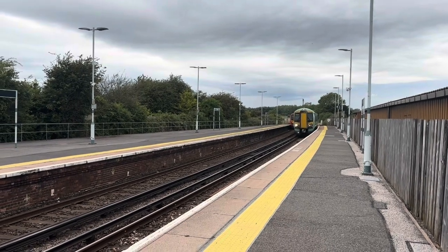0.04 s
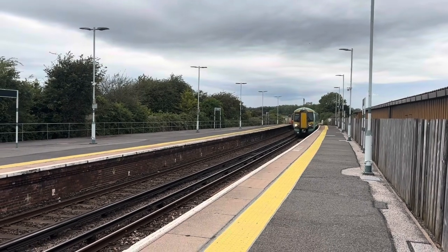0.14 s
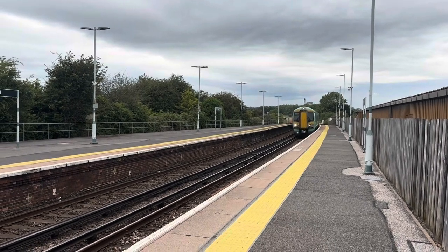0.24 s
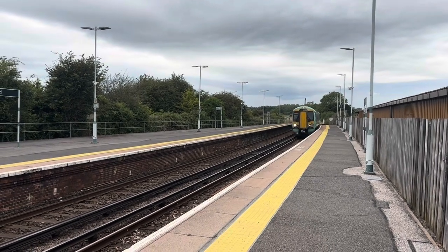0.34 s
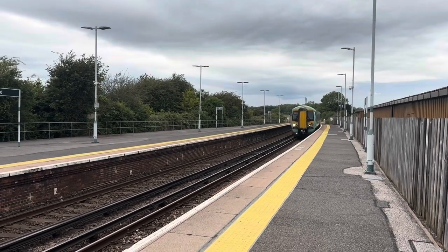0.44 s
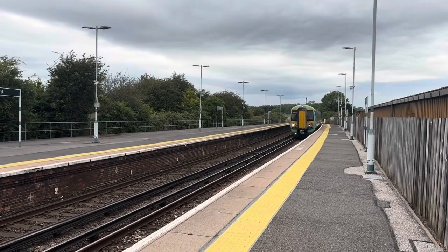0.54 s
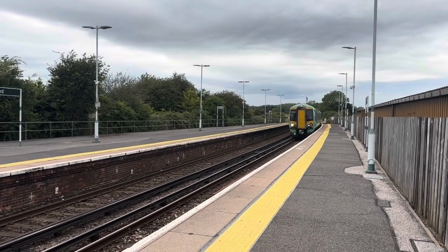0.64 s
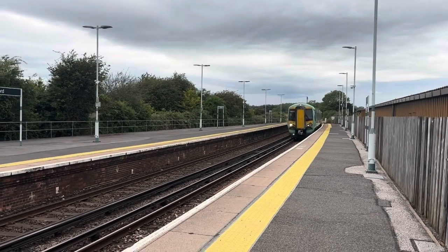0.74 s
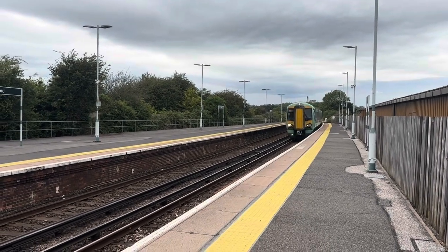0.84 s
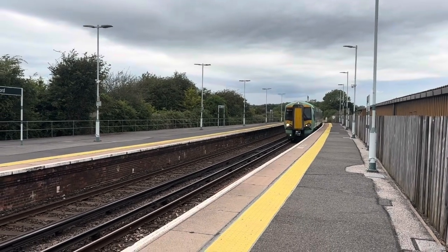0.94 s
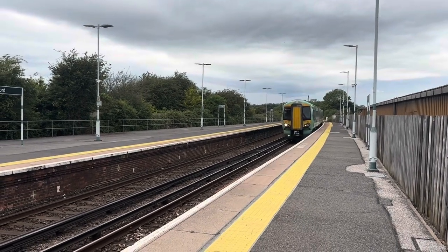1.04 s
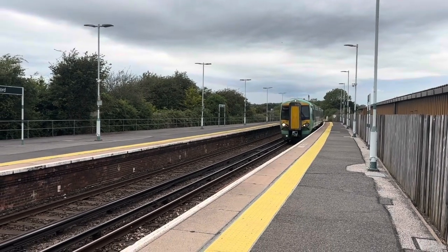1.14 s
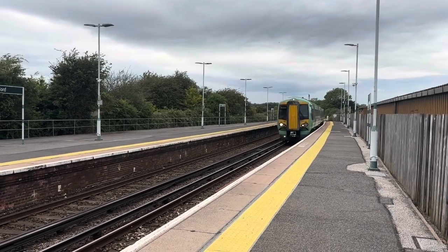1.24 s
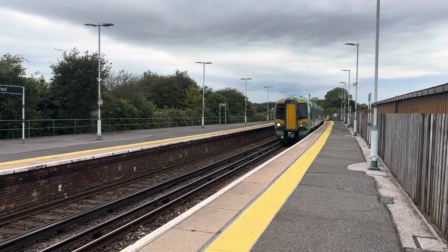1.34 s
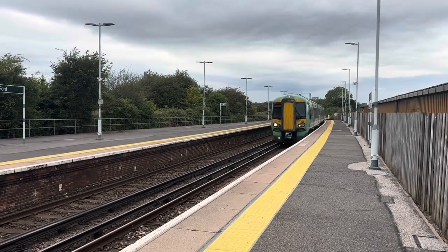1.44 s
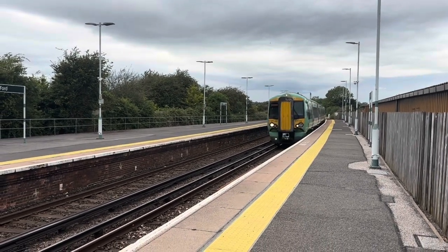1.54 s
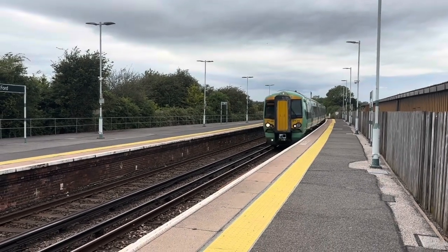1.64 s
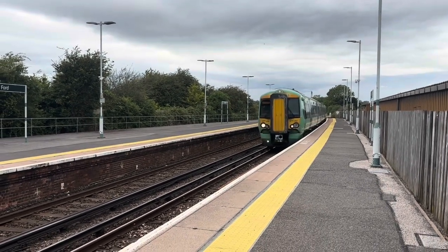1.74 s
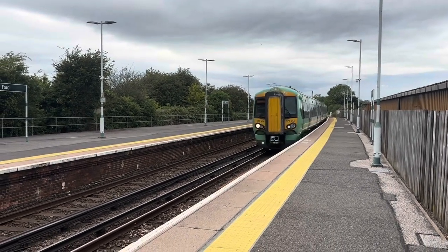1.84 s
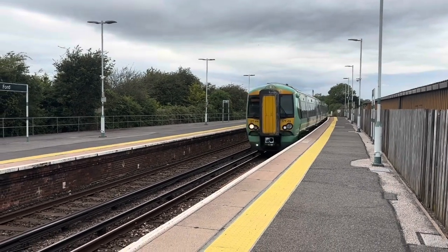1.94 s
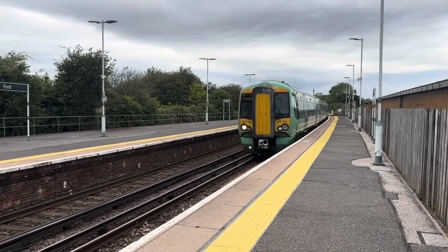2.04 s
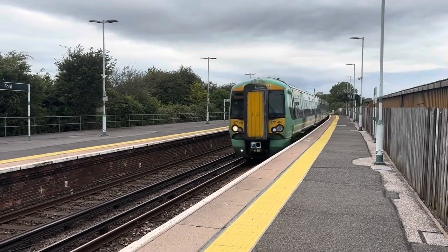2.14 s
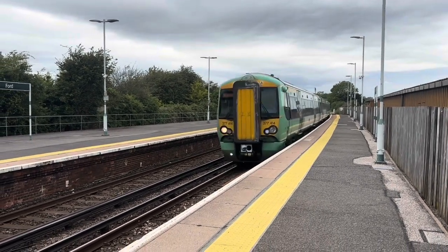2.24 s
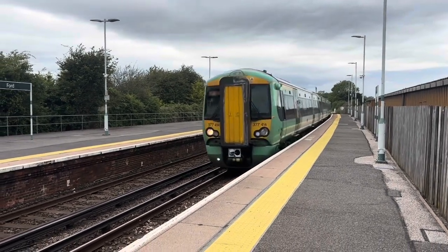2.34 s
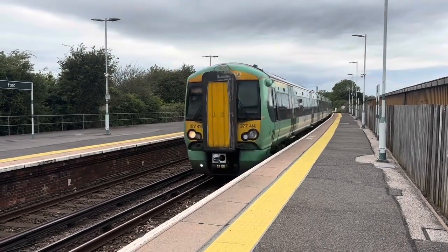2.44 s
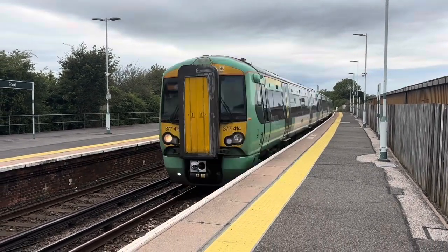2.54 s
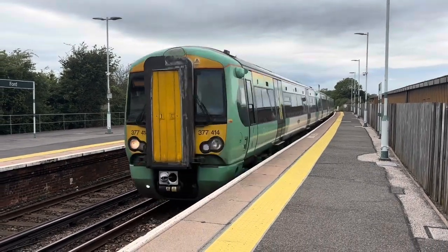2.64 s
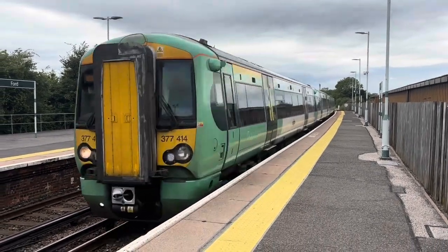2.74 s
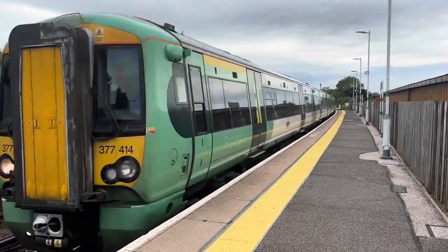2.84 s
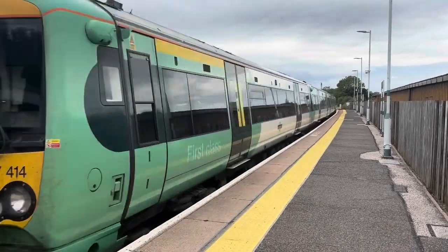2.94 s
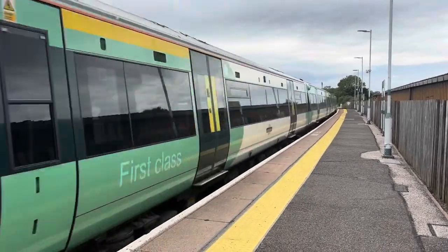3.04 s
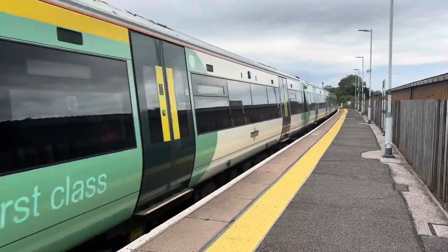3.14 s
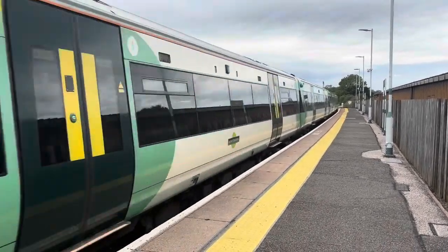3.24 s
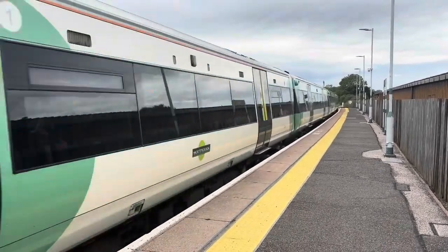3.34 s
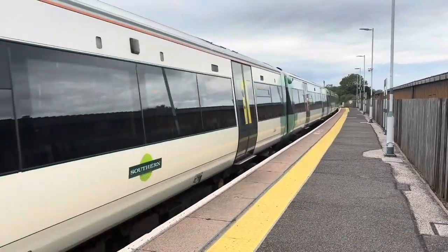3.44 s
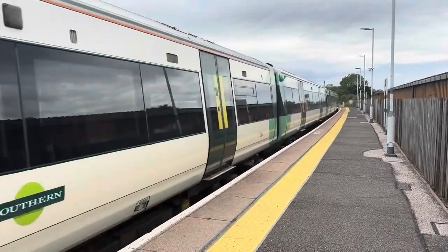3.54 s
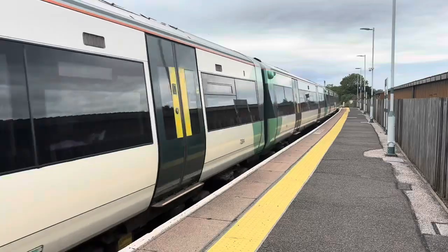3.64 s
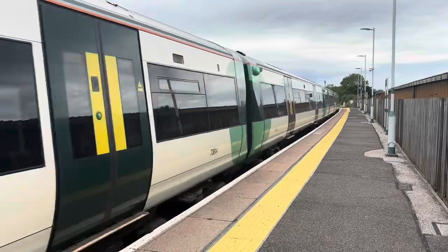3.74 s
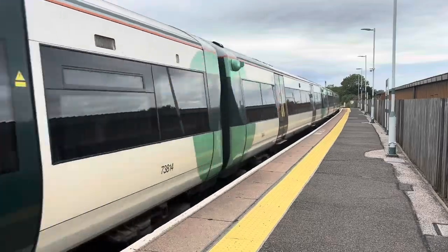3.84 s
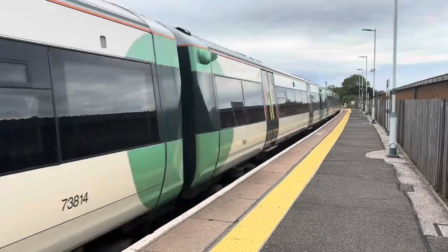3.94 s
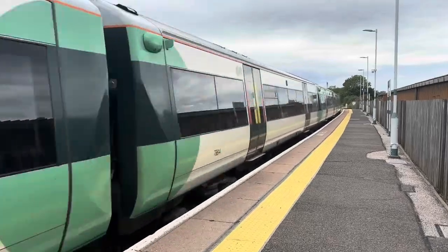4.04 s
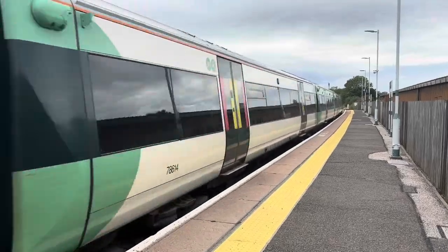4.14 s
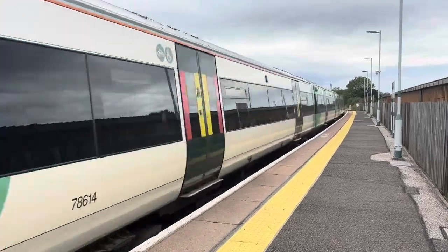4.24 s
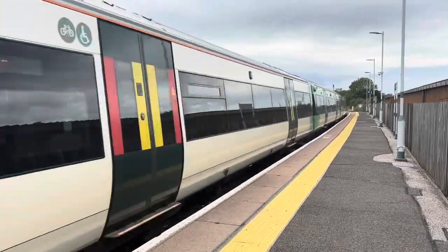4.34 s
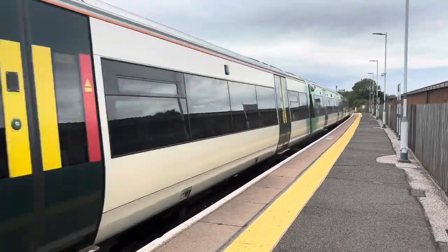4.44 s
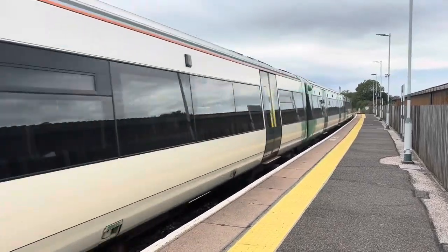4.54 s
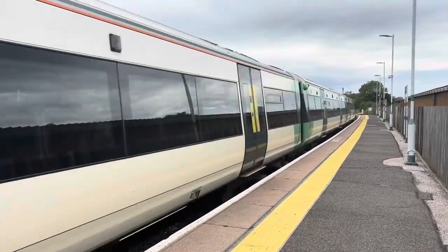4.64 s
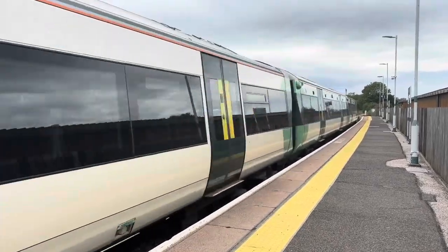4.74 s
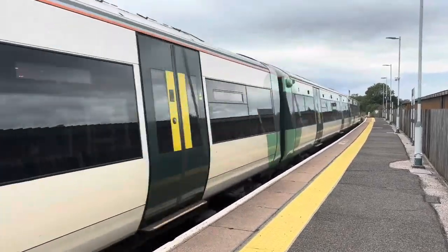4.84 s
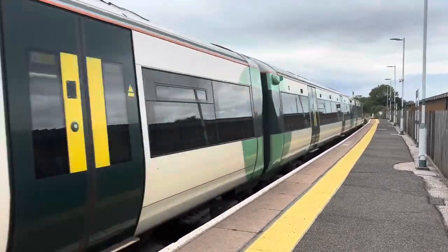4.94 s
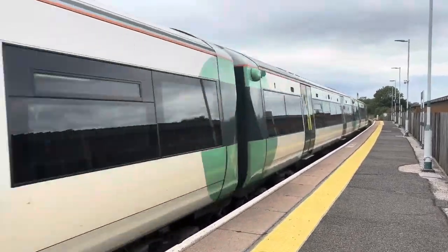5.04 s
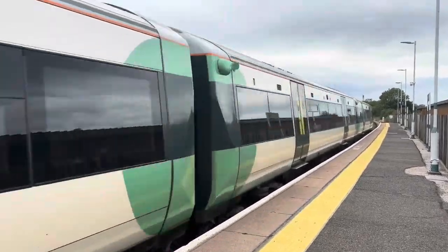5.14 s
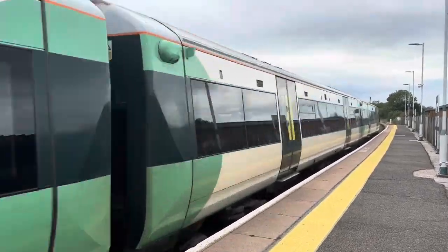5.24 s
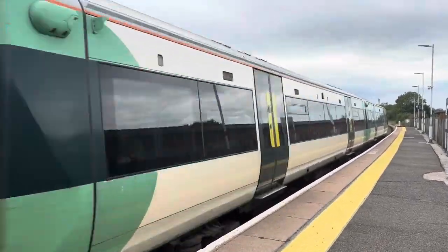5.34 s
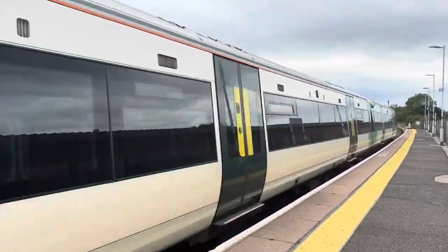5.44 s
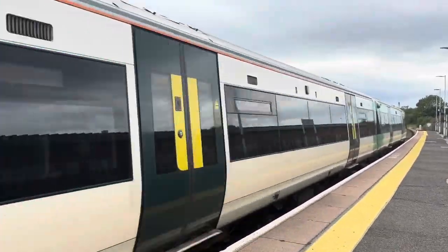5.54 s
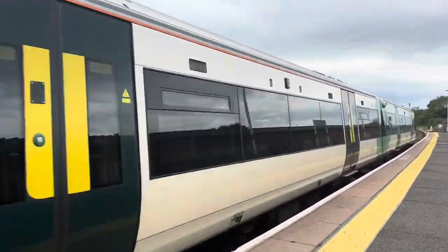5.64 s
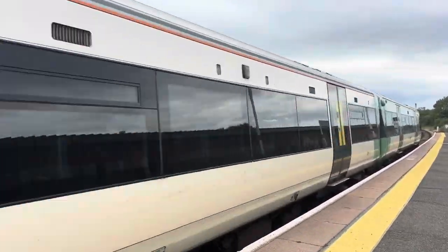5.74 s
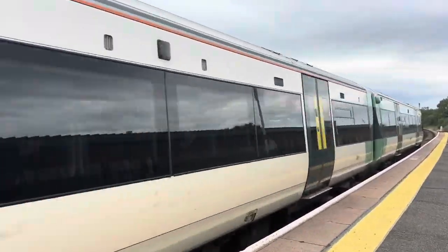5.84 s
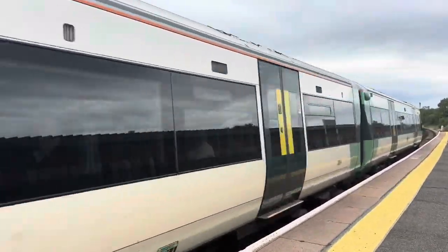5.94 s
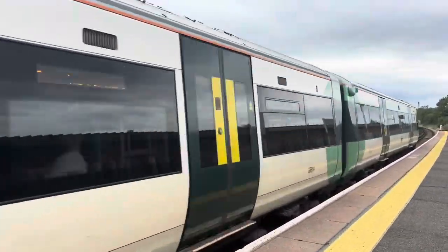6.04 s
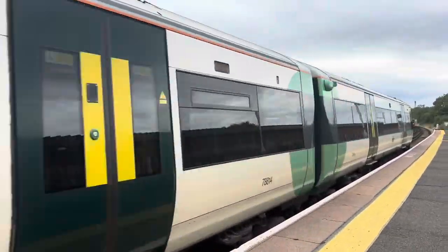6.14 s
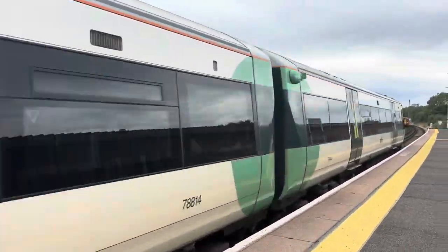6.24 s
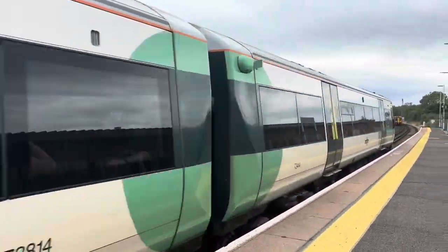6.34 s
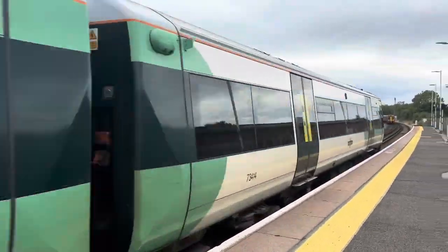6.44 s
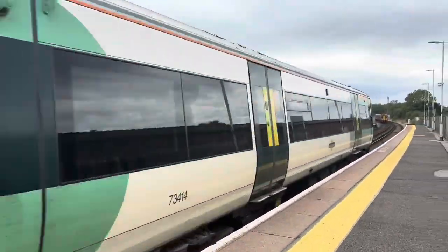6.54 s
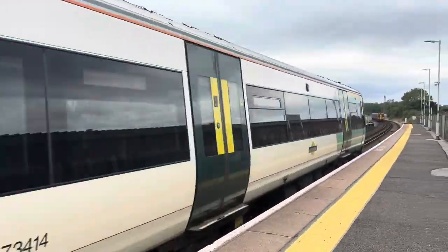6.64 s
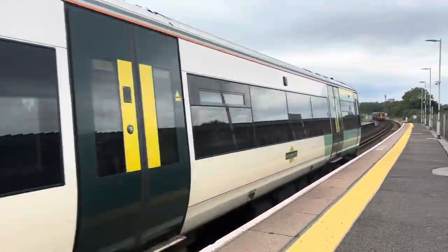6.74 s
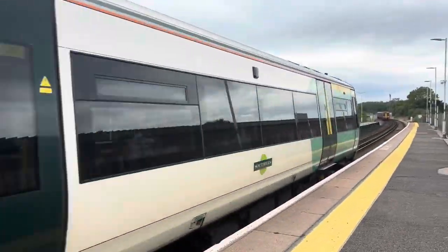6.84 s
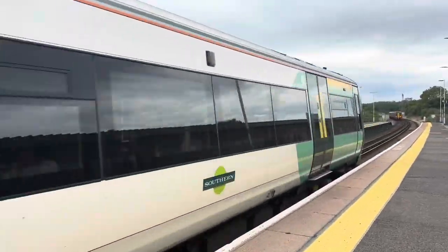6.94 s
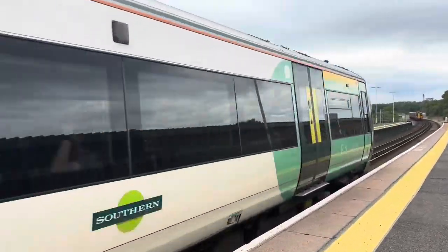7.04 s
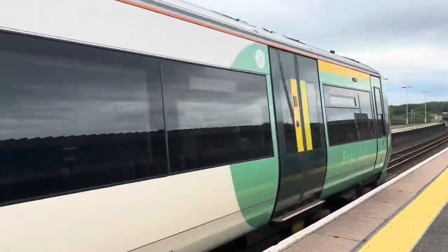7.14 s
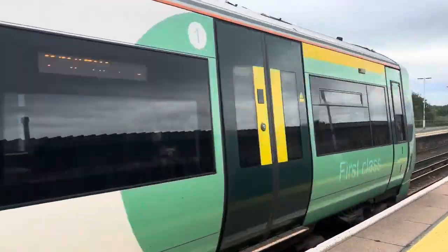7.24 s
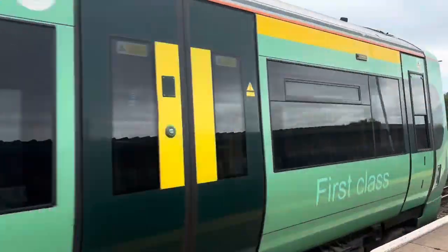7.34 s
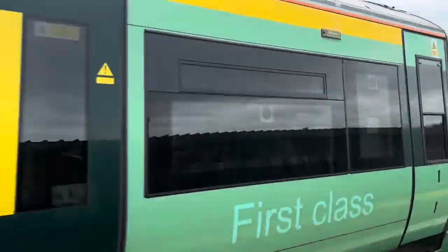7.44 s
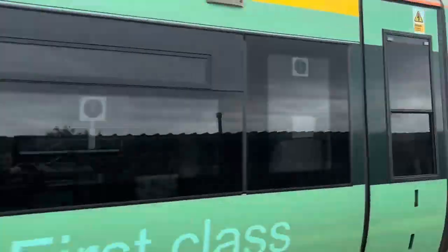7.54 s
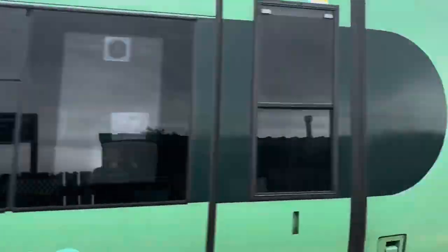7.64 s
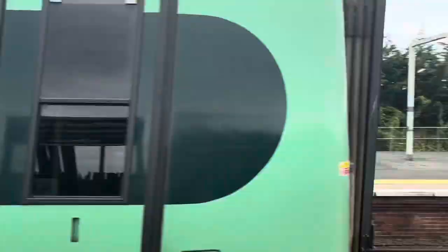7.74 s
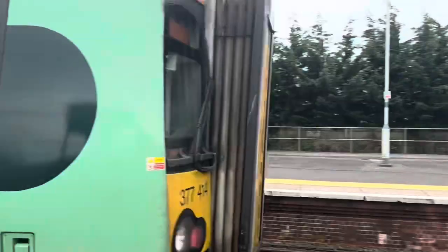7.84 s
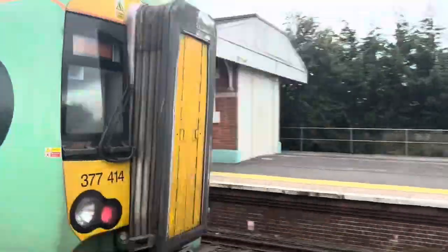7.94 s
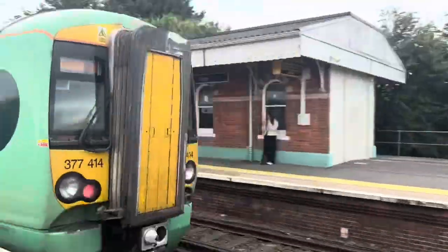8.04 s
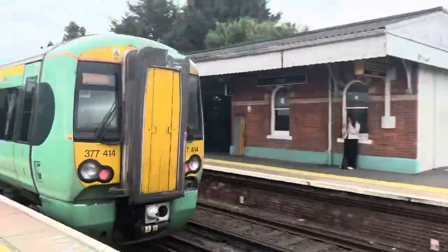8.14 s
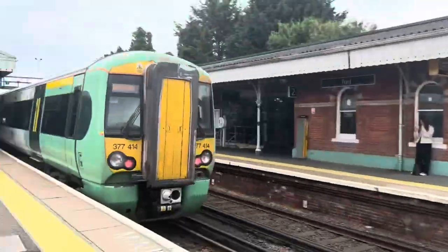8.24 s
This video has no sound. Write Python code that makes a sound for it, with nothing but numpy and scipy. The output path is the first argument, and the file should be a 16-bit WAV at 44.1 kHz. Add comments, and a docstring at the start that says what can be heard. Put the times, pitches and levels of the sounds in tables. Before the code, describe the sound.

On an open-air platform, rails sing and ping faintly as an electric train approaches. Its rumble grows, then it bursts past very close with a heavy roar and rapid, uneven metallic clacks from wheels on rail joints. Brief steel chirps and sharp hisses from the power rail flicker on top. After the last car the roar drops to a low rumble. Handheld stereo microphone at the platform edge, with short echoes off walls and fence.

```python
"""A four-car electric train passes close by a platform at steady speed: its wheels roar and hammer on rail joints.
Each bogie's noise swells and falls with its distance; sixteen axles strike the same few joints in turn.
Collector shoes hiss, tick and ring on the conductor rail; steel whines in short chirps; wheels ring in one note.
Behind it the rails sing in narrow bands, far knocks ping, low rumble swells, and walls scatter the blows."""
import sys
import numpy as np
from scipy import signal
from scipy.fft import rfft, irfft
from scipy.io import wavfile
from scipy.ndimage import uniform_filter1d

SR = 44100
rng = np.random.default_rng(int(sys.argv[2]) if len(sys.argv) > 2 else 0)


def output_pcm(signal):
    """Save a mono or channel-first signal as 16-bit PCM at the path in sys.argv[1].

    Samples are clipped to [-1, 1] before scaling.
    """
    pcm = np.clip(np.atleast_2d(signal).T, -1, 1) * 32767
    wavfile.write(sys.argv[1], SR, np.round(pcm).astype(np.int16))


N = 366030
TIME = np.arange(N) / SR

# track-bed rumble: t/s, level/dB
RUMBLE_LEVEL = [(0, -51), (0.4, -42.5), (0.9, -35), (1.55, -34.5), (1.9, -29), (2.35, -29.5), (2.9, -24.5),
                (3.8, -23), (4.45, -30), (4.8, -24.5), (5.25, -22.5), (5.6, -36), (6.25, -28), (6.7, -37),
                (7.15, -38), (7.6, -32), (8.3, -33)]
# low swells of air and ground, some of them wheel thumps: peak t/s, level/dB
LOW_SWELLS = [(1.19, -30.5), (3.37, -21.5), (4.22, -25), (5.38, -22), (5.75, -23), (6.55, -24), (6.8, -28),
              (7.4, -27), (7.85, -27.5), (8.04, -25)]
# rail resonances: f/Hz, width/Hz, level/dB
RAIL_MODES = [(395, 56, 2.5), (492, 30, 1), (646, 84, 5.5), (777, 42, -1.5), (990, 275, 3),
              (1640, 160, -12.5), (6960, 680, -18.5)]
# strength of the rail's singing: t/s, level/dB
SINGING_LEVEL = [(0, -37.5), (.7, -34), (.9, -30), (1.3, -33.5), (1.9, -30.5), (2.6, -29), (4, -36.5),
                 (8.3, -42)]
# far knocks carried by the rail: t/s, f/Hz, level/dB, t60/s
RAIL_PINGS = [(.771, 1045, -20.5, 0.05), (.858, 320, -23.5, 0.07), (1.012, 206, -25, 0.09),
              (8.04, 95, -13.5, 0.084)]
# squeals of wheels and shoes: start/s, end/s, start f/Hz, end f/Hz, width/Hz, level/dB
SQUEALS = [(2.164, 2.273, 1680, 1610, 200, -42), (2.694, 2.783, 1900, 1610, 260, -34.5),
           (3.629, 3.779, 2390, 2314, 400, -41), (3.86, 3.95, 2420, 2360, 250, -40),
           (5.01, 5.075, 2410, 2340, 140, -35), (5.08, 5.118, 2350, 2320, 70, -37.5),
           (5.135, 5.23, 2300, 2260, 130, -43), (5.198, 5.226, 2920, 2900, 80, -45),
           (5.255, 5.297, 2970, 2920, 90, -44.5), (5.308, 5.345, 2960, 2910, 70, -41.5),
           (5.385, 5.44, 2940, 2860, 80, -41), (5.448, 5.48, 2900, 2860, 60, -41.5),
           (5.48, 5.535, 2880, 2850, 90, -46.5), (5.605, 5.66, 2880, 2860, 60, -47),
           (5.705, 5.765, 8400, 7500, 900, -48), (7.92, 7.97, 2400, 2350, 250, -49),
           (8.05, 8.11, 2400, 2350, 250, -51)]

# shoe knocks on the conductor rail: t/s, level/dB, ring level/dB
SHOE_CLINKS = [(3.648, -60, -5), (3.685, -50, -6), (3.862, -50, 4), (4.81, -59, -3), (4.962, -63, 1),
               (5.02, -56, 8), (5.149, -58, -5)]
# shoe resonances: f/Hz, level/dB, t60/s
SHOE_MODES = [(2340, 3, .16), (3950, -3, .03), (5010, -1, .03), (5400, 2, .03), (6985, -1, .085),
              (7520, 0, .07), (8450, -4, .03)]
# hard shoe pressure: start/s, end/s, rise/s, sizzle level/dB, scrape level/dB
SHOE_PRESSES = [(0.772, 1.153, 0.041, -55.5, -63), (1.32, 1.4, .06, -60, -68),
                (1.57, 1.64, 0.056, -57, -59), (2.103, 2.286, 0.089, -59, -54),
                (2.441, 3.14, 0.13, -55.5, -49), (3.633, 3.74, 0.074, -49, -52),
                (4.09, 4.18, 0.054, -48, -51), (4.228, 4.435, 0.18, -35.5, -41.5),
                (4.465, 4.504, .015, -42, -36.5), (4.477, 4.664, .04, -33, -46),
                (4.55, 4.594, .02, -43, -34), (5.55, 5.755, 0.22, -49, -49), (5.74, 5.926, 0.073, -45, -60),
                (5.917, 6.168, 0.093, -41, -45), (6.336, 6.453, 0.019, -40, -45.5),
                (6.5, 6.74, 0.045, -54, -55), (6.774, 6.937, 0.056, -40.5, -48),
                (7.186, 7.217, 0.033, -50, -50), (8.06, 8.175, 0.037, -58, -64)]

# noise spectra: f/Hz, relative density/dB
FAR_ROAR_SPECTRUM = [(60, 11), (150, 8.5), (300, -1.5), (430, -2), (540, 1.5), (680, 2.5), (860, -4.5),
                     (1080, -6.5), (1300, -18.5), (2000, -11.5), (4000, -57)]
NEAR_ROAR_SPECTRUM = [(60, -9), (130, -2.5), (240, -2), (320, -7), (430, 0), (600, -7.5), (780, -13.5),
                      (1020, -14), (1400, -23.5), (2200, -28.5), (4000, -76)]
RUSH_SPECTRUM = [(500, 7.5), (1200, 3.5), (1650, -2), (2000, -6), (2350, 3.5), (2800, 2), (3300, -2),
                 (4300, -3.5), (4800, -2.5), (5800, -9), (7500, -29), (10000, -42), (15500, -24)]
GROUND_SPECTRUM = [(15, -45), (26, -23), (42, -13.5), (58, 1), (78, -1.5), (115, -6.5), (170, -16),
                   (320, -15), (800, -67)]
SIZZLE_SPECTRUM = [(4000, -30), (7500, -10), (9300, -2), (10500, -3), (11300, 2), (12500, -1), (14400, -1),
                   (15600, -3)]
SCRAPE_SPECTRUM = [(3000, -3.5), (5500, 2), (6400, 6), (7000, 4.5), (8000, 4.5), (9400, -2.5), (11000, -38),
                   (15000, -12)]
BLOW_SPECTRUM = [(30, 4), (90, -2.5), (170, 2), (260, -2), (320, 1.5), (450, 3.5), (620, -1), (780, -10.5),
                 (1020, -9), (1400, -18), (1950, -23), (2350, -27), (4000, -36), (12000, -51.5)]

# stereo lean: f/Hz, left minus right/dB
STEREO_LEAN = [(100, -0.6), (400, 0), (1000, 0.2), (2500, 1.2), (4800, 2.8), (7000, 0.5), (9000, 0)]
# likeness of the microphone's two ports: f/Hz, correlation/-1..1
PORT_LIKENESS = [(40, .9), (150, .85), (450, .83), (1000, .58), (1500, 0), (1900, -.1), (2500, .66),
                 (3400, .72), (4700, .52), (5700, .22), (6600, .9), (7300, .97), (8500, .6), (9600, .99),
                 (10500, .99), (11400, .6), (12100, .98), (13300, .98), (14100, .5), (15200, .98)]
# phase lead of the left port: f/Hz, lead/rad
LEFT_LEAD = [(1900, 0), (2500, .5), (4700, .6), (5700, -1.1), (6400, 0), (7700, -.1), (8600, -1.5),
             (9400, -3), (10700, -3.25), (11500, -4.9), (11900, -6.2), (13700, -6.4), (14700, -8.7),
             (15200, -9.4)]
# microphone turning to follow the tail: t/s, turn/0..1
MIC_TURN = [(7.33, 0), (7.9, 0.9)]

# bogies, front to back: blow level/dB, clank level/dB, roar level/dB
BOGIE_LEVELS = [(4.5, -4, 2.5), (4, -6, 4.5), (-2.5, 9, -7), (4, -4, 3.5), (5, -1.5, -9.5), (-2, -9, 0.5),
                (-4, 7, -5.5), (-9, -7, -2)]
# joints struck by every axle in turn: first axle t/s, level/dB, second axle re first/dB, clank/dB, thud/dB
AXLE_JOINTS = [(2.19, -32.5, -5.5, 0.5, -2), (2.464, -32, -9, 5.5, -6), (3.606, -41, 1.5, -1, 2)]
# single clear blows on rail joints near and far: t/s, level/dB, clank/dB, thud/dB, ring f/Hz, knock/dB
CLEAR_BLOWS = [(.854, -38, -9, 9, 148, -18), (1.01, -44, -7, 8, 210, -16), (2.041, -51, -1, 4, 450, 2),
               (2.145, -36.5, 2, 2, 523, 1), (2.203, -27, 1, 4, 395, -15.5), (2.365, -40, -8, -4, 524, -2),
               (2.469, -30.5, -24, -2, 412, -10.5), (2.627, -29.5, -6, -15, 445, -12.5),
               (2.692, -28, 10.5, -3, 420, -1), (2.712, -29, -6, -14, 620, -1.5),
               (2.821, -24.5, -1, -12, 580, -2.5), (2.853, -26.5, 2, -12, 527, -3.5),
               (2.983, -26, 4, -3, 574, -4.5), (3.078, -31.5, -13, 6, 447, -9),
               (3.125, -39, -10, 18, 450, -12), (3.361, -37, -6, -7, 420, -2),
               (3.436, -32, -14, -10, 435, -12), (3.52, -25, -1, -1, 423, -3.5),
               (3.644, -25.5, 2, -10, 268, -1.5), (3.688, -22.5, -4, -23, 447, -7.5),
               (3.791, -26.5, 5, 1, 502, 0), (3.823, -25, -9, 0, 427, -7), (3.861, -27.5, 9, 4, 272, -2),
               (3.983, -23, 7.5, 4, 357, -3), (4.026, -25, -11, -8, 450, -4),
               (4.139, -26.5, 3, -4, 183, -4.5), (4.202, -36.5, -4, -11, 463, 0),
               (4.336, -41, -12, 20, 430, -18.5), (4.425, -35.5, 11, 0, 534, -4),
               (4.678, -24.5, 4.5, -6, 490, -9), (4.807, -21.5, 1.5, -0.5, 281, -8),
               (4.842, -21.5, -15, 0, 374, -6), (4.906, -32.5, -11, -2, 383, -15.5),
               (4.961, -25.5, -4, -3, 345, -6), (5.019, -27, 3, 2, 450, -8),
               (5.146, -25, 5.5, -8, 473, -2.5), (5.186, -24.5, -5, -7, 430, -7.5),
               (5.296, -28.5, 2, -6, 444, -6), (5.336, -29, -12, -4, 457, -10.5),
               (5.384, -35.5, -6, -4, 430, -6.5), (5.58, -38, 1, 3, 412, -1.5),
               (5.837, -28.5, 2, 0, 247, -6.5), (5.966, -31.5, 10, -7, 274, -2),
               (5.997, -22, -4, 4.5, 380, -10), (6.12, -28, 0, -4, 468, -9.5),
               (6.142, -30.5, -15, -9, 450, -15), (6.188, -36, 11, -2, 469, -8),
               (6.312, -26, 3, -9, 473, -6.5), (6.349, -28, 3, -12, 384, -6), (6.38, -34, -6, -1, 400, -7),
               (6.465, -30, 3, -4, 426, -9), (6.495, -29, -6, -4, 368, -8),
               (6.667, -38.5, -14, 10, 438, -0.5), (6.765, -35.5, 3, -4, 484, -2.5),
               (6.85, -39, 9, -7, 440, -3), (7.009, -29.5, 6, 6, 258, -6), (7.138, -24, 2.5, 2, 348, -8.5),
               (7.177, -29, 0, -18, 358, -3), (7.238, -37, -15, 3, 420, -2.5),
               (7.29, -29.5, 0, -6, 196, -6.5), (7.542, -46, -6, 0, 450, -5.5), (7.921, -34, 4, 5, 182, -8),
               (8.074, -28.5, -8, 7, 590, -12), (8.167, -49.5, -8, -4, 556, -8),
               (8.21, -48, -7, 3, 555, -8)]
# wheel and rail-end resonances before detuning: f/Hz, level/dB, t60/s
KNOCK_MODES = [(340, -2.5, 0.034), (570, 0, 0.044), (774, -1.5, 0.026), (980, -5.5, 0.037),
               (1670, -12.5, 0.027), (2360, -12, 0.026)]
# roar carried by the rails from distant wheels: t/s, level/dB
CARRIED_LEVEL = [(0, -35), (0.6, -37), (0.9, -32.5), (1.3, -38), (2.1, -33), (3, -35), (7, -34), (7.7, -31),
                 (8.3, -30.5)]
# rolling wheels' sinking note: t/s, f/Hz
WHEEL_PITCH = [(1.5, 2506), (3.0, 2370), (4.0, 2312), (8.3, 2293)]

# train speed; spacing of cars, of a car's bogies, of a bogie's axles
SPEED_M_PER_S, CAR_M, BOGIES_M, WHEELBASE_M = 17.2, 20.0, 14.17, 2.72
# blow ring: pitch where every axle strikes in turn; width and height for all blows
AXLE_RING_HZ, RING_WIDTH_HZ, RING_DB = 438, 47, 2.5
LOW_CUT_HZ, EDGE_HZ = 41, 15750


def gain_of(db):
    """Decibels to amplitude factor."""
    return 10 ** (np.asarray(db) / 20)


def evened(x):
    """Scale to rms 1."""
    return x / np.sqrt(np.mean(x ** 2) + 1e-20)


def read(points, hz):
    """Interpolate a spectrum linearly over log frequency."""
    f, value = np.transpose(points)
    return np.interp(np.log(hz + 1), np.log(f + 1), value)


def follow(rows):
    """Interpolate a time curve at every sample."""
    return np.interp(TIME, *np.transpose(rows))


def add(mix, s, sound):
    """Mix stereo sound in at time s."""
    part = mix[:, max(round(s * SR), 0):][:, :sound.shape[1]]
    part += sound[:, :part.shape[1]]


def wander(rate_hz):
    """Random curve of rms 1, low-passed near rate_hz."""
    hz = np.fft.rfftfreq(N, 1 / SR)
    spectrum = rfft(rng.standard_normal(N)) / (1 + (hz / rate_hz) ** 4)
    return evened(irfft(spectrum, N))


def coloured(pair, spectrum=((0, 0),)):
    """Shape two independent noises; set correlation, phase and level between the ports; mono rms 1."""
    size = pair.shape[1]
    hz = np.fft.rfftfreq(size, 1 / SR)
    left, other = rfft(pair) * gain_of(read(spectrum, hz))
    same = np.clip(read(PORT_LIKENESS, hz), -1, 1)
    lean = gain_of(read(STEREO_LEAN, hz) / 2)
    right = same * left + np.sqrt(1 - same ** 2) * other
    right = right * np.exp(-1j * read(LEFT_LEAD, hz))
    out = irfft(np.array([left * lean, right / lean]), size)
    return out / np.sqrt(np.mean(out.mean(0) ** 2) + 1e-20)


def turbulence(spectrum, patchy_db):
    """Stereo noise that flares and fades in time-frequency patches."""
    z = signal.stft(rng.standard_normal((2, N)), nperseg=1024)[2]
    patches = uniform_filter1d(rng.standard_normal(z.shape[1:]), size=4, axis=0)
    patches = uniform_filter1d(patches, size=8, axis=1)
    pair = signal.istft(z * gain_of(patchy_db * evened(patches)), nperseg=1024)[1][:, :N]
    return coloured(pair, spectrum)


def ringing(hz, width_hz):
    """Stereo noise in one resonance that follows the curve hz."""
    lowpass = signal.butter(2, width_hz / 2, fs=SR, output="sos")
    noise = rng.standard_normal((2, 2, len(hz) + SR // 10))
    rub = signal.sosfilt(lowpass, noise)[..., -len(hz):]  # drop the filter's onset
    carrier = np.exp(2j * np.pi * np.cumsum(hz) / SR)
    return coloured(((rub[0] + 1j * rub[1]) * carrier).real)


def lag(bogie):
    """Seconds by which a bogie trails the first."""
    return (bogie // 2 * CAR_M + bogie % 2 * BOGIES_M) / SPEED_M_PER_S


def passing(loudest_s, reach_m, falloff):
    """Power-summed gain of all bogies, each falling as a power of distance; loudest_s is the first bogie's peak."""
    power = 0
    for k, (_, _, roar_db) in enumerate(BOGIE_LEVELS):
        along_m = SPEED_M_PER_S * (TIME - loudest_s - lag(k))
        power = power + gain_of(roar_db) ** 2 / (1 + (along_m / reach_m) ** 2) ** falloff
    return np.sqrt(power)


def station(x, t60_s=0.52, delay_s=0.0098):
    """Fence, platform walls and car sides scatter the blows back as sparse, decaying echoes."""
    t = np.arange(SR * 3 // 4) / SR
    sparse = rng.standard_normal((2, len(t))) * (rng.random((2, len(t))) < 2000 / SR)
    taps = sparse * (t > delay_s) * gain_of(-60 * t / t60_s)
    tail = coloured(taps, [(100, -5.5), (2000, 9.0), (8000, -4.5)]) / np.sqrt(len(t))
    return signal.fftconvolve(x.mean(0)[None], tail, axes=1)[:, :N]


def singing_rail(waver_db=1.26, waver_hz=4.8):
    """Wheels far down the line keep the rail ringing in narrow bands."""
    f = np.fft.rfftfreq(N, 1 / SR)
    bands = sum(gain_of(db) / np.sqrt(width) / (1 + (2 * (f - hz) / width) ** 2) for hz, width, db in RAIL_MODES)
    song = turbulence(np.column_stack([f, 20 * np.log10(bands)]), patchy_db=2.0)
    return song * gain_of(follow(SINGING_LEVEL) + waver_db * wander(waver_hz))


def pings(rise_s=0.0022):
    """The rail carries far knocks as short decaying sine notes."""
    out, t = np.zeros((2, N)), np.arange(SR // 4) / SR
    for s, hz, db, t60_s in RAIL_PINGS:
        envelope = gain_of(db - 60 * t / t60_s) * (1 - np.exp(-t / rise_s))
        note = 2 * envelope * np.sin(2 * np.pi * hz * t)
        add(out, s, np.array([note, note]))
    return out


def rumble(swell_s=0.059):
    """Ground shakes under the cars' weight; short low swells of air and ground rise out of it."""
    swells = sum(gain_of(db) * np.exp(-.5 * ((TIME - s) / swell_s) ** 2) for s, db in LOW_SWELLS)
    level = np.hypot(gain_of(follow(RUMBLE_LEVEL)), swells)
    return turbulence(GROUND_SPECTRUM, patchy_db=1.0) * level


def wheel_whines():
    """Rubbing sets steel squealing in short chirps of sinking pitch."""
    out = np.zeros((2, N))
    for start, end, first_hz, last_hz, width_hz, db in SQUEALS:
        size = max(round((end - start) * SR), 2)
        chirp = ringing(np.linspace(first_hz, last_hz, size), width_hz)
        add(out, start, chirp * signal.windows.tukey(size, .5) * gain_of(db))
    return out


def clinks(scuff_t60_s=0.1, tick_t60_s=.012, tick_db=-2, scuff_db=-4):
    """A shoe hits a rail end with a tick, scuffs over it and excites its own modes."""
    out, t = np.zeros((2, N)), np.arange(SR // 4) / SR
    ring = sum(gain_of(db - 60 * t / t60) * np.sin(2 * np.pi * hz * t) for hz, db, t60 in SHOE_MODES)
    envelope = gain_of(-60 * t / scuff_t60_s) + gain_of(tick_db - 60 * t / tick_t60_s)
    for s, db, ring_db in SHOE_CLINKS:
        scuff = rng.standard_normal((2, len(t))) * envelope
        rung = signal.fftconvolve(scuff, ring[None], axes=1)[:, :len(t)]
        clink = gain_of(ring_db) * coloured(rung) + gain_of(scuff_db) * coloured(scuff, SCRAPE_SPECTRUM)
        add(out, s, clink * (1 - t / t[-1]) * gain_of(db))
    return out


def shoes(sizzle_db=-65.0, scrape_db=-56, full_turn_db=3, release_s=0.032, sway_db=1.4, sway_hz=11):
    """Shoes sliding on the conductor rail: faint hiss from every bogie, bursts where one presses hard."""
    facing = gain_of(full_turn_db * follow(MIC_TURN))
    sizzle = passing(loudest_s=2.8, reach_m=20.6, falloff=0.9) * facing * gain_of(sizzle_db)
    scrape = passing(loudest_s=3.1, reach_m=10.0, falloff=0.99) * facing * gain_of(scrape_db)
    for start, end, rise_s, high_db, low_db in SHOE_PRESSES:
        press = np.clip((TIME - start) / rise_s, 0, 1)
        press = press * np.exp(-np.maximum(TIME - end, 0) / release_s)
        sizzle = np.hypot(sizzle, press * gain_of(high_db))
        scrape = np.hypot(scrape, press * gain_of(low_db))
    hiss = turbulence(SIZZLE_SPECTRUM, patchy_db=3.0) * sizzle
    hiss = hiss + turbulence(SCRAPE_SPECTRUM, patchy_db=3.0) * scrape
    return hiss * gain_of(sway_db * wander(sway_hz))


def strikes():
    """Every axle on each joint in turn: t/s, level/dB, clank/dB, thud/dB, ring f/Hz."""
    rows = []
    for first_s, joint_db, second_db, clank_db, thud_db in AXLE_JOINTS:
        for k, (bogie_db, bogie_clank_db, _) in enumerate(BOGIE_LEVELS):
            for axle in (0, 1):
                s = first_s + lag(k) + axle * WHEELBASE_M / SPEED_M_PER_S
                level_db = joint_db + bogie_db + axle * second_db
                rows.append((s, level_db, clank_db + bogie_clank_db, thud_db, AXLE_RING_HZ))
    return rows


def joints(rise_s=0.0036, hold_s=0.011, ring_t60_s=0.17, clank_t60_s=0.21, rattle_db=1.0, rattle_hz=130):
    """A wheel dips into a joint and strikes; the bogie rattles and rings with rail and sleepers."""
    out, t = np.zeros((2, N)), np.arange(2 ** 14) / SR
    lead_s = .04  # room for the swell before the strike
    age = np.maximum(t - lead_s - hold_s, 0)
    swell = 1 / (1 + np.exp((lead_s - t) / rise_s))
    rattle = gain_of(rattle_db * wander(rattle_hz))
    hz = np.fft.rfftfreq(len(t), 1 / SR)
    # band weights of clank and thud
    treble, bass = read([(900, 0), (1800, 1)], hz), read([(170, 1), (350, 0)], hz)
    for s, db, clank_db, thud_db, ring_hz, *_ in CLEAR_BLOWS + strikes():
        jitter = rattle[rng.integers(N - len(t)):][:len(t)]
        drive = rng.standard_normal((2, len(t))) * swell * jitter
        low = rfft(drive * gain_of(-60 * age / ring_t60_s))
        high = rfft(drive * gain_of(-60 * age / clank_t60_s))
        ring = 1 + gain_of(RING_DB) / (1 + (2 * (hz - ring_hz) / RING_WIDTH_HZ) ** 2)
        balance = gain_of(treble * clank_db + bass * thud_db)
        blow = irfft((low * (1 - treble) + high * treble) * ring * balance)
        add(out, s - lead_s, coloured(blow, BLOW_SPECTRUM) * gain_of(db))
    return out


def knocks(chatter_per_s=450, chatter_t60_s=0.14, rise_s=0.0043, scatter=0.09):
    """Loose gear chatters steel on steel: clusters of random clicks excite modes detuned per blow."""
    out, t = np.zeros((2, N)), np.arange(2 ** 14) / SR
    short = t[:SR // 20]
    force = (1 - np.exp(-t / rise_s)) * gain_of(-60 * t / chatter_t60_s)
    for s, db, _, _, _, knock_db in CLEAR_BLOWS:
        clicks = force * rng.standard_normal((2, len(t))) * (rng.random(len(t)) < chatter_per_s / SR)
        detune = np.exp(scatter * rng.standard_normal(len(KNOCK_MODES)))
        ring = 0
        for (hz, mode_db, t60_s), k in zip(KNOCK_MODES, detune):
            ring = ring + gain_of(mode_db - 60 * short / t60_s) * np.sin(2 * np.pi * hz * k * short)
        rung = signal.fftconvolve(clicks, ring[None], axes=1)[:, :len(t)]
        add(out, s, evened(rung) * gain_of(db + knock_db))
    return coloured(out, [(1200, 2.5), (2500, -5.5), (6000, -8)]) * np.sqrt(np.mean(out ** 2))


def wheel_ring(ring_db=-48, width_hz=380, flutter_db=3.0, flutter_hz=18):
    """Rolling wheels ring in one broad note that falls off steeply with distance."""
    near = passing(loudest_s=2.67, reach_m=4.6, falloff=1.4)
    level = gain_of(ring_db + flutter_db * wander(flutter_hz))
    return ringing(follow(WHEEL_PITCH), width_hz) * near * level


def rolling(roar_db=-21.5, rush_db=-41.0, full_turn_db=3.5, judder_db=0.92, far_judder_db=2.5, judder_hz=22):
    """Rough treads shake rail and wheel: roar carried by the rails, roar from near by and a bright rush."""
    judder = wander(judder_hz)
    far = turbulence(FAR_ROAR_SPECTRUM, patchy_db=3.0)
    far = far * gain_of(follow(CARRIED_LEVEL) + far_judder_db * judder)
    near = turbulence(NEAR_ROAR_SPECTRUM, patchy_db=2.5) * passing(loudest_s=2.816, reach_m=6.96, falloff=1.82)
    near = near * gain_of(roar_db + judder_db * judder)
    rush = turbulence(RUSH_SPECTRUM, patchy_db=2.1) * passing(loudest_s=2.86, reach_m=11.6, falloff=1.216)
    rush = rush * gain_of(rush_db + full_turn_db * follow(MIC_TURN) + 0.58 * judder_db * judder)
    return far + near + rush


def scene():
    """Train and track; the blows also scatter around the station."""
    blows = joints() + knocks() + clinks() + pings()
    train = rolling() + rumble() + shoes() + singing_rail() + wheel_ring() + wheel_whines()
    return train + blows + gain_of(-13) * station(blows)


def record(dry):
    """Microphone: bass cut, soft rounding of peaks, then a treble band limit."""
    bass_cut = signal.butter(4, LOW_CUT_HZ, "highpass", fs=SR, output="sos")
    heard = signal.sosfilt(bass_cut, dry)
    held = heard / (1 + (heard / .96) ** 6) ** (1 / 6)
    band_limit = signal.firwin(511, EDGE_HZ, window=("kaiser", 9), fs=SR)
    return signal.oaconvolve(held, band_limit[None], "same")


dry = scene()
out = record(dry)
output_pcm(out)
```